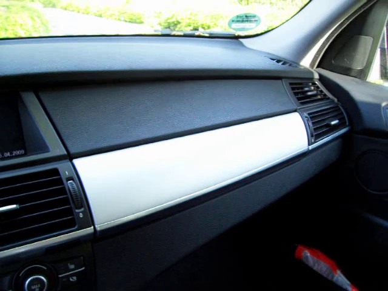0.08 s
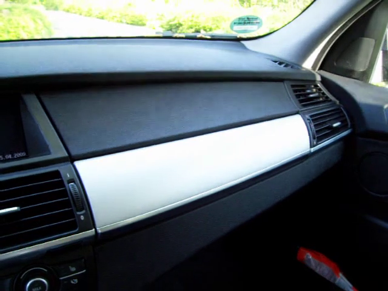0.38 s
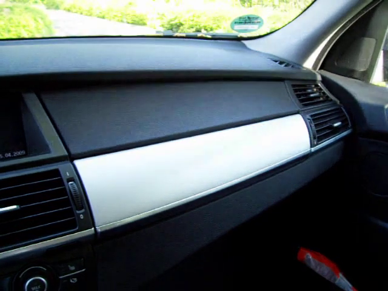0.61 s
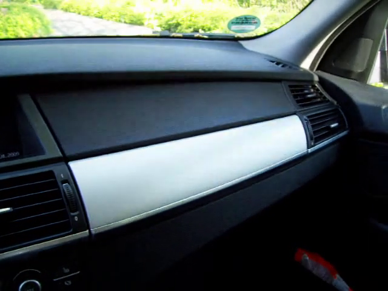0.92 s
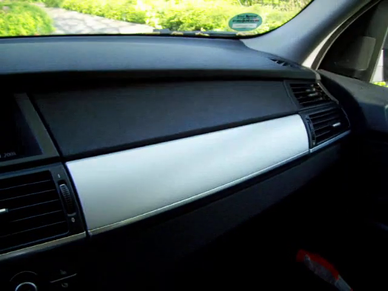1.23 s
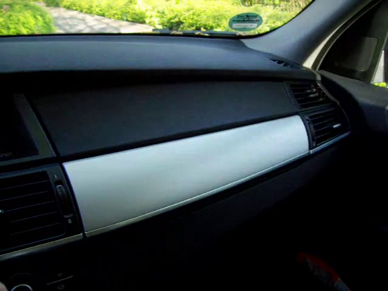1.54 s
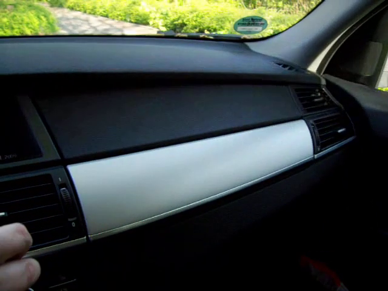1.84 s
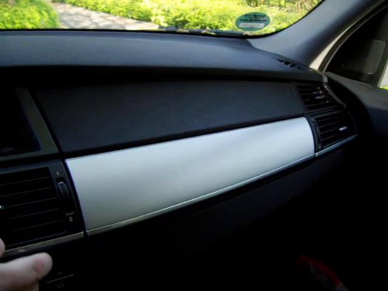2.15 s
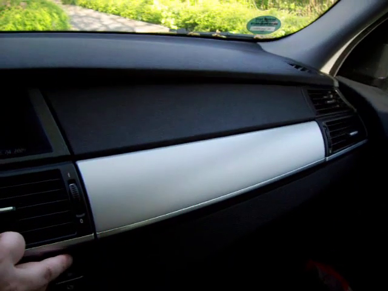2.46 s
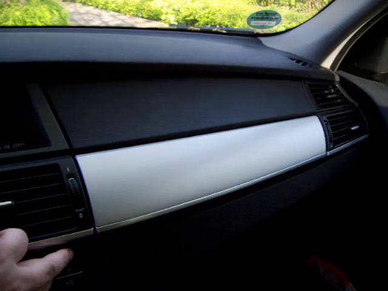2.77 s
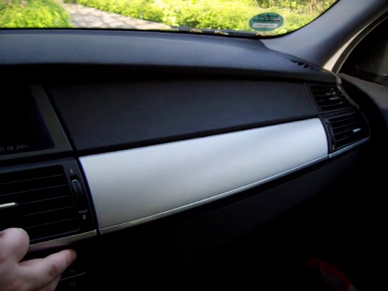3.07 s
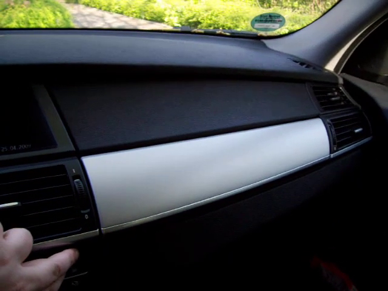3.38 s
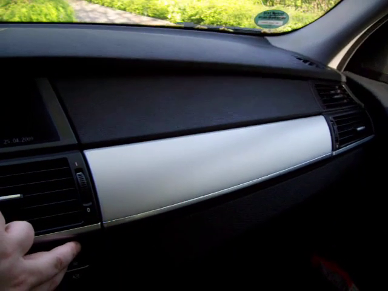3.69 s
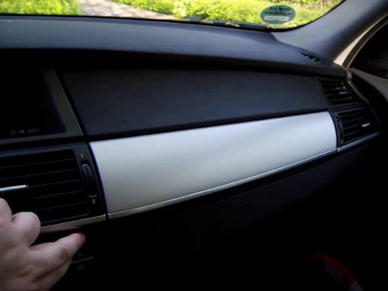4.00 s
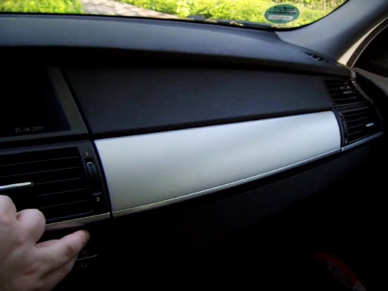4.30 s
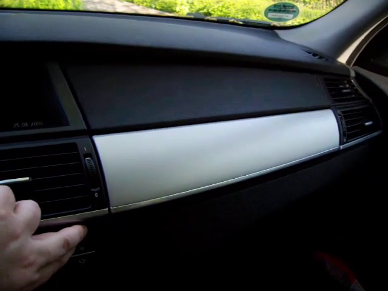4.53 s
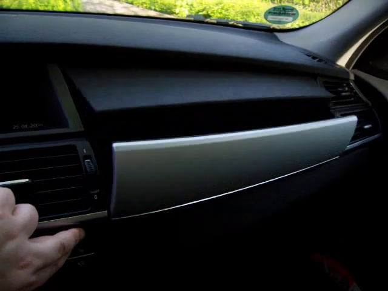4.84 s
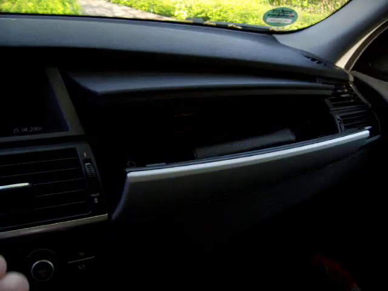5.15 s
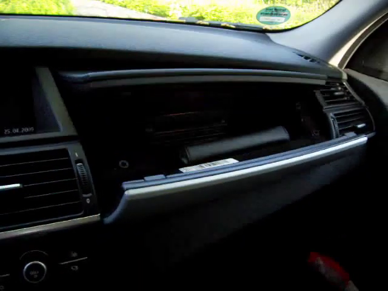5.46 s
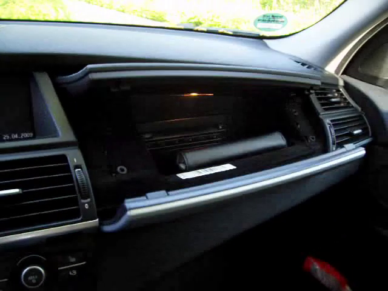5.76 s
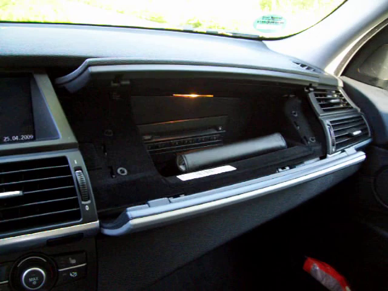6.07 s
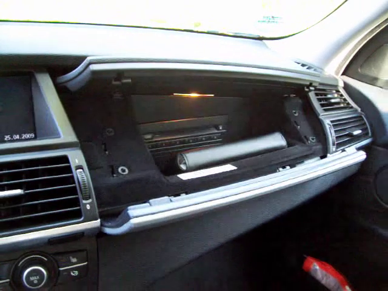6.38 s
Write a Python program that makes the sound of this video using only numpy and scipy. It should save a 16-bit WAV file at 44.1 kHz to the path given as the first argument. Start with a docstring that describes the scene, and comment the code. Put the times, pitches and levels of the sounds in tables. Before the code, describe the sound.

A hand-held camera picks up the quiet hum of a small padded car cabin, along with its own hiss, high whine, chirping ticks and a few small clicks. After one sharp tap on the dashboard trim, the glove box releases with a quick plastic rattle and a low jolt. Its lids whir open, land with a knock and settle, followed by a few light knocks and dull handling bumps.

```python
"""A quiet hum fades in inside a parked car, with small sharp clicks from a hand-held camera and a fingernail
on the trim. The camera adds hiss, a thin whine and a chirping tick on every frame. A finger presses the
glove box button and the latch drive rattles free with a dull jolt. The two lids swing open on a whirring
geared damper (a small brake), knock against their stops and quiver. Soft handling thumps follow."""
import sys
import numpy as np
from scipy import signal
from scipy.fft import rfft, irfft
from scipy.io import wavfile

SR = 44100
rng = np.random.default_rng(int(sys.argv[2]) if len(sys.argv) > 2 else 0)


def inscribe(sig):
    """Save sig as 16-bit PCM at rate SR to the path in sys.argv[1].

    A 1-D sig is mono; a 2-D sig holds one channel per row.
    Samples are clipped to [-1, 1] before scaling.
    """
    pcm = np.round(np.clip(np.atleast_2d(sig).T, -1, 1) * 32767)
    wavfile.write(sys.argv[1], SR, pcm.astype(np.int16))


N = 292383
T = np.arange(N) / SR
RING_T = T[:SR // 3]  # time axis for short sounds

# A mode is a note an object rings at. Its ring time (t60) is how long it takes to fade by 60 dB.
# air noise in the cabin: (pitch [Hz], level [dB])
CABIN_SPECTRUM = [(20, -28), (40, 4.5), (62, 0), (105, 6), (180, 0.5), (380, 1), (520, 2), (750, 4),
                  (1000, -4), (1300, -16), (2500, -30), (8000, -47)]
# low humming notes: (pitch [Hz], level [dB], ring time [s])
LOW_HUM_MODES = [(39.2, 0, 0.24), (108.7, -0.5, 0.13)]
# amplifier hiss: (pitch [Hz], level [dB])
HISS_SPECTRUM = [(200, 6), (1300, 5), (1900, 3.5), (2700, 4.5), (3400, -1), (5000, 0), (7300, 1.5),
                 (8500, -9)]
# rise and fall of the hiss, in two stretches: (time [s], level [dB])
HISS_LEVELS = [
    [(0.8, -53), (0.882, -51.5), (0.938, -56), (1.318, -52), (2.05, -54)],
    [(2.2, -54.5), (2.42, -51), (2.612, -55), (3.238, -57.5), (3.85, -54.5)],
]
# steady electronic tones: (pitch [Hz], level [dB])
STEADY_TONES = [(960, -61.5), (2840, -73), (4490, -69.5)]
# harmonics of the power supply whistle, lowest first: (level [dB])
WHISTLE_HARMONICS = [-48.5, -50, -54.5]
# small sharp clicks, from the camera's mechanism and a fingernail tick on the trim:
# (time [s], ring level [dB], snap level [dB], snap fade time [s])
CLICKS = [(0.3418, -30.5, -43, 0.011), (0.444, -39, -22, .013), (.562, -34, -39, 0.021),
          (2.092, -40, -33, 0.052), (3.907, -8.5, -30.5, 0.012)]
# camera body: (pitch [Hz], level [dB], ring time [s])
CAMERA_MODES = [(588, -17, 0.082), (744, -5, 0.028), (875, 1.5, 0.015), (1070, -3, 0.018),
                (1180, -1.5, 0.011), (2080, -10.5, 0.017), (3800, -9, 0.0032), (4220, -20, 0.01)]
# bright snaps, lens thumps and low bumps: (pitch [Hz], level [dB])
SNAP_SPECTRUM = [(300, -12), (1500, -10.5), (3300, 3), (5000, -1.5), (7000, 1.5), (9000, -11)]
LENS_SPECTRUM = [(40, -12.5), (150, 3), (350, -3.5), (1000, -27.5)]
BUMP_SPECTRUM = [(15, -18), (35, -5.5), (60, 6), (120, -8), (250, -6), (450, -28), (1500, -64.5)]
# dashboard knocks; a loose part touches lightly just before it lands:
# (time [s], thud level [dB], crack level [dB], head start of the touch [s])
DASHBOARD_KNOCKS = [(3.045, -29, -53, 0.0046), (3.158, -32.5, -54, 0.0036), (4.491, -19.5, -40, .011),
                    (4.535, -15, -24.5, 0.0056), (4.592, -16.5, -22.5, .012), (4.63, -11.5, -18.5, 0.001),
                    (4.658, -13, -26, 0.0015), (4.672, -18, -21.5, 0.00085), (4.716, -13, -26, 0.0015),
                    (4.728, -14.5, -37, 0.00074), (4.742, -35, -19.5, 0.0009), (4.821, -23.5, -42, 0.00092),
                    (5.114, -10, -25.5, 0.0073), (5.121, -7.5, -50.5, 0.00025), (5.24, -25.5, -45, 0.0012),
                    (5.455, -16.5, -55, 0.0012), (6.022, -19.5, -29, .006), (6.089, -31.5, -53, 0.0011)]
# lid panels: (pitch [Hz], level [dB], ring time [s])
LID_MODES = [(240, -17, .05), (285, -15, .04), (326, -13, .08), (430, -10, .035), (533, -5, .045),
             (597, -3, .055), (648, -1, .04), (740, -3, .04), (850, -2, .04), (950, -8, .03),
             (1050, -11, .025)]
# small hard parts of latch and hinges: (pitch [Hz], level [dB], ring time [s])
HARDWARE_MODES = [(1450, -9, .05), (1570, -5, .06), (1850, -8, .04), (2089, -5, .1), (2253, -3, .08),
                  (2330, -1, .06), (2526, -1, .07), (2599, -2, .07), (2774, -4, .06), (3034, -4, .05),
                  (3261, -4, .09), (3890, -5, .06)]
# bright plastic trim: (pitch [Hz], level [dB])
PLASTIC_SPECTRUM = [(600, -32.5), (1000, -9), (1350, -4), (1900, -2), (2450, 4.5), (3000, -1.5),
                    (4000, -2.5), (5500, -6.5), (7200, -7.5), (8500, -23.5)]
# hollow dashboard: (pitch [Hz], level [dB])
HOLLOW_SPECTRUM = [(30, -22), (60, -10), (150, -16), (260, -1), (440, -6.5), (600, -1.5), (750, 6),
                   (1000, 3), (1300, -8.5), (2200, -34.5)]
# echo in the cabin: (pitch [Hz], level [dB])
ECHO_SPECTRUM = [(100, 5), (800, -9), (3000, -10.5), (8000, -19.5)]
# box that holds the latch drive: (pitch [Hz], level [dB], ring time [s])
LATCH_BOX_MODES = [(85, -22, .12), (133, -14, .18), (234, -11, .15), (326, -10, .12), (420, -15, .04),
                   (560, -6, .04), (640, -3, .04), (748, -1, .07), (840, -2, .04), (935, -4, .04),
                   (1020, -3, .035)]
# a jolt as the lid releases, then soft handling thumps: (time [s], level [dB], fade time [s])
LOW_BUMPS = [(4.746, -35, .94), (5.255, -40.5, .18), (6.034, -39.5, 0.29), (6.175, -45, 0.26)]

FRAME_S, FIRST_TICK_S = .07686, .0374
TOP_HZ = 8900  # the camera's treble limit


def undb(db):
    """Turn decibels into a number to multiply by."""
    return 10 ** (np.asarray(db) / 20)


def unit(x):
    """Scale a signal to an average power of 1."""
    return x / np.sqrt(np.mean(x ** 2))


def noise(length=N):
    """White noise: an even hiss."""
    return rng.standard_normal(length)


def decay(t60):
    """A fade that drops 60 dB in t60 seconds."""
    return np.exp(-np.log(1000) * RING_T / t60)


def add(out, start_s, sound):
    """Mix a short sound in at its start time."""
    part = out[int(start_s * SR):][:len(sound)]
    part += sound[:len(part)]


def through(x, response):
    """Play x through an object, given the sound it makes when tapped once."""
    return signal.fftconvolve(x, response / np.linalg.norm(response))[:len(x)]


def colour(x, spectrum, size=8192):
    """Shape the bass and treble of x to follow a spectrum."""
    hz, db = np.transpose(spectrum)
    grid_hz = np.arange(size // 2 + 1) * SR / size
    gain = undb(np.interp(np.log(grid_hz + 1), np.log(hz), db))
    # these steps make the filter ring only after a sound, never before it
    cepstrum = irfft(np.log(gain))
    cepstrum[1:size // 2] *= 2
    cepstrum[size // 2 + 1:] = 0
    return through(x, irfft(np.exp(rfft(cepstrum))))


def ring(modes, scatter_db=0):
    """A struck object rings with fading notes; their strengths can vary with where it is hit."""
    sizes = undb(scatter_db * noise(len(modes)))
    return sum((-1) ** k * sizes[k] * undb(db) * decay(t60) * np.sin(2 * np.pi * hz * RING_T)
               for k, (hz, db, t60) in enumerate(modes))


def cabin_hum(air_db=-54, boom_db=-56.5):
    """Even air noise of the car, with a soft low hum beneath it."""
    air = colour(noise(), CABIN_SPECTRUM)
    boom = through(noise(), ring(LOW_HUM_MODES))
    return undb(air_db) * air + undb(boom_db) * boom


def electronics(hiss_boost_db=3, pulse_hz=59.94, low_hz=7867, high_hz=8133, buzz_hz=7550):
    """Amplifier hiss, faint tones and a thin, high two-tone whine with a fast buzz."""
    hiss_db = hiss_boost_db + np.interp(T, *np.vstack(HISS_LEVELS).T)
    hiss = undb(hiss_db) * colour(noise(), HISS_SPECTRUM)
    tones = sum(undb(db) * np.sin(2 * np.pi * hz * T) for hz, db in STEADY_TONES)
    whine = undb(-57) * np.sin(2 * np.pi * low_hz * T) + undb(-58) * np.sin(2 * np.pi * high_hz * T)
    flip = np.sign(np.sin(np.pi * pulse_hz / 2 * T))  # turns the wave over once every two pulses
    pulses = np.sin(np.pi * pulse_hz * (T + .0095)) ** 8
    buzz = undb(-54) * pulses * np.sin(2 * np.pi * buzz_hz * T)
    return hiss + tones + flip * whine + buzz


def wavering_whistle(centre_hz=5975, drift_hz=35, jitter_hz=110, db=-62):
    """A thin electronic whistle that never holds its pitch."""
    slow_drift = unit(colour(noise(), [(2, 0), (9, 0), (40, -30), (300, -90)]))
    fast_jitter = unit(colour(noise(), [(1000, 0), (4000, -30)]))
    hz = centre_hz + drift_hz * slow_drift + jitter_hz * fast_jitter
    return undb(db) * np.sin(2 * np.pi * np.cumsum(hz) / SR)


def supply_whistle(rest_hz=465, slide_hz=76.04, slide_at_s=.049, slide_s=.0077,
                   swell_at_s=.0533, lag_s=.0025, rise_s=.0051, fall_s=.006, scatter_db=.9):
    """Reading out each frame pulls the power supply's whistle upward; it swells and dies away."""
    frame, since_tick = np.divmod(T - FIRST_TICK_S, FRAME_S)
    hz = rest_hz + slide_hz * (1 + np.tanh((since_tick - slide_at_s) / slide_s)) / 2
    phase = 2 * np.pi * np.cumsum(hz) / SR
    frame_strengths = undb(scatter_db * noise(int(frame[-1]) + 2))
    out = np.zeros(N)
    for k, db in enumerate(WHISTLE_HARMONICS):
        late = since_tick - swell_at_s - k * lag_s  # higher harmonics peak later
        swell = np.where(late < 0, 1 / np.hypot(1, late / rise_s), np.exp(-(late / fall_s) ** 2))
        out += undb(db) * swell * np.sin((k + 1) * phase)
    return frame_strengths[frame.astype(int)] * out


def frame_ticks(tick_db=-31, bump_db=-43):
    """Each camera frame ends in a soft bump and a tiny tick."""
    since_tick = (T - FIRST_TICK_S) % FRAME_S
    tick = undb(-60 * since_tick / .005)
    bump = np.exp(-((since_tick - .065) / .0018) ** 2)
    muffle = signal.butter(1, [70, 1100], "band", fs=SR, output="sos")
    return signal.sosfilt(muffle, undb(tick_db) * tick - undb(bump_db) * bump)


def sharp_clicks():
    """The camera's mechanism and a fingernail on the trim click: a short ring plus a bright snap."""
    rings, snaps = np.zeros((2, N))
    for start_s, ring_db, snap_db, snap_t60 in CLICKS:
        add(rings, start_s, undb(ring_db) * ring(CAMERA_MODES))
        add(snaps, start_s, undb(snap_db) * decay(snap_t60) * noise(len(RING_T)))
    return rings + colour(snaps, SNAP_SPECTRUM)


def focus_steps(first_s=.1835, tick_db=-50, tick_hz=3100, thump_db=-45, t60=.037):
    """Every third frame the lens motor takes a faint step."""
    since_step = (T - first_s) % (3 * FRAME_S)
    step = undb(-60 * since_step / t60)
    tick = through(step * noise(), ring([(tick_hz, 0, .006)]))
    thump = colour(step * noise(), LENS_SPECTRUM)
    return undb(tick_db) * tick + undb(thump_db) * thump


def plastic_clatter(force, ring_db):
    """The trim clatters brightly, and the small hard parts ring along."""
    return colour(force, PLASTIC_SPECTRUM) + undb(ring_db) * through(force, ring(HARDWARE_MODES))


def knocks(touch_db=-6, rise_s=.00092, hollow_t60=.15, crack_t60=.056):
    """Each blow sets the panel ringing and makes loose plastic joints chatter for a moment."""
    thuds, cracks, shakes = np.zeros((3, N))
    for lands_s, thud_db, crack_db, head_start_s in DASHBOARD_KNOCKS:
        # a cushioned blow is an octave duller for every 25 dB its crack lies below its thud
        cutoff_hz = min(2010 * 2 ** ((crack_db - thud_db) / 25), TOP_HZ)
        cushion = signal.butter(2, cutoff_hz, fs=SR, output="sos")
        for start_s, db in [(lands_s - head_start_s, touch_db), (lands_s, 0)]:
            chatter = noise((2, len(RING_T))) * (1 - np.exp(-RING_T / rise_s))
            thud = signal.sosfilt(cushion, ring(LID_MODES, scatter_db=5))
            shake = signal.sosfilt(cushion, chatter[0] * decay(hollow_t60))
            add(thuds, start_s, undb(thud_db + db) * thud)
            add(shakes, start_s, undb(thud_db + db) * shake)
            add(cracks, start_s, undb(crack_db + db) * chatter[1] * decay(crack_t60))
    hollow = colour(shakes, HOLLOW_SPECTRUM)
    return undb(-8) * thuds + undb(-17) * hollow + undb(2) * plastic_clatter(cracks, ring_db=-37)


def cabin_echo(sound, db=-21.5, t60=.37, delay_s=.004):
    """A short echo whose treble is swallowed by seats and carpet."""
    tail = colour(noise(len(RING_T)), ECHO_SPECTRUM) * decay(t60) * (RING_T > delay_s)
    return undb(db) * through(sound, tail)


def gears(modes, start_s, stop_s, rise_s, fall_s, surge_db, surge_s, tooth_hz, uneven_db, rub,
          body_db, panel_db, rasp_db, soft_hz):
    """Plastic teeth strike unevenly and rub in between, shaking their mount and the trim."""
    gap_scatter, force_scatter = noise((400, 2)).T
    strike_times = start_s + np.cumsum(np.exp(.14 * gap_scatter)) / tooth_hz
    strikes = np.zeros(N)
    strikes[np.minimum(strike_times * SR, N - 1).astype(int)] = undb(uneven_db * force_scatter)
    contact = signal.fftconvolve(strikes, decay(.012))[:N]
    contact /= np.sqrt(np.mean(contact[(T > start_s) & (T < stop_s)] ** 2))
    moving = np.clip((T - start_s) / rise_s, 0, 1) * np.exp(-np.maximum(T - stop_s, 0) / fall_s)
    load = undb(surge_db * np.exp(-((T - start_s) / surge_s) ** 2))  # highest at the start
    pressure = moving * load * (contact + rub) / (1 + rub)
    body = undb(body_db) * colour(pressure * noise(), HOLLOW_SPECTRUM)
    panel = undb(panel_db) * through(pressure * noise(), ring(modes))
    # greased teeth touch softly, which dulls the rasp
    grease = signal.butter(1, soft_hz, fs=SR, output="sos")
    rasp = signal.sosfilt(grease, pressure * noise())
    return body + panel + undb(rasp_db) * plastic_clatter(rasp, ring_db=-6)


def low_bumps():
    """Dull low bumps: a jolt as the lid releases, then soft handling thumps."""
    out = np.zeros(N)
    for start_s, db, t60 in LOW_BUMPS:
        add(out, start_s, undb(db) * decay(t60) * noise(len(RING_T)))
    return colour(out, BUMP_SPECTRUM)


def lid_quiver(start_s=5.14, t60=3.9, panel_hz=735, panel_db=-47, slide_hz=5300, slide_db=-58):
    """The open lids quiver on their hinges and settle with a faint sliding hiss."""
    quiver = (T > start_s) * undb(-60 * np.maximum(T - start_s, 0) / t60)
    slide = through(noise() * quiver, ring([(slide_hz, 0, .006)]))
    panel = through(noise() * quiver, ring([(panel_hz, 0, .045)]))
    return undb(panel_db) * panel + undb(slide_db) * slide


def scene(mic_on_s=.335, mic_start_db=-24, mic_rise_db_per_s=51.5):
    """The glove box opens in the small padded cabin, over the sounds of the air and the camera."""
    latch = gears(LATCH_BOX_MODES, start_s=4.586, stop_s=4.74, rise_s=.002, fall_s=.017,
                  surge_db=3.5, surge_s=.005, tooth_hz=175.6, uneven_db=5, rub=1,
                  body_db=-29.5, panel_db=-24.5, rasp_db=-28, soft_hz=14000)
    damper = gears(LID_MODES, start_s=4.872, stop_s=5.116, rise_s=.013, fall_s=.0029,
                   surge_db=7.5, surge_s=.083, tooth_hz=340, uneven_db=3.5, rub=.7,
                   body_db=-34, panel_db=-34.5, rasp_db=-35.5, soft_hz=5430)
    glove_box = knocks() + latch + damper + lid_quiver()
    echo = cabin_echo(glove_box)
    camera = supply_whistle() + frame_ticks() + focus_steps() + electronics() + wavering_whistle()
    # the microphone switches on and the background comes up steadily
    fade_db = np.minimum(mic_start_db + mic_rise_db_per_s * (T - mic_on_s), 0)
    background = (cabin_hum() + camera) * (T > mic_on_s) * undb(fade_db)
    return (background + sharp_clicks() + glove_box + echo + low_bumps())[None]


def record(dry):
    """The camera rounds off the treble and keeps nothing of the top octave."""
    soft = signal.sosfilt(signal.butter(14, 8150, fs=SR, output="sos"), dry)
    return signal.sosfilt(signal.ellip(10, .2, 75, TOP_HZ, fs=SR, output="sos"), soft)


dry = scene()
out = record(dry)
inscribe(out)
```